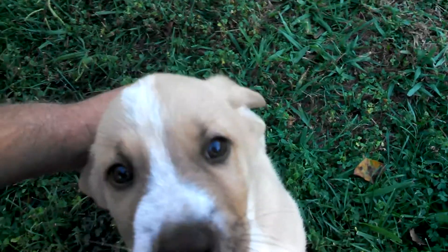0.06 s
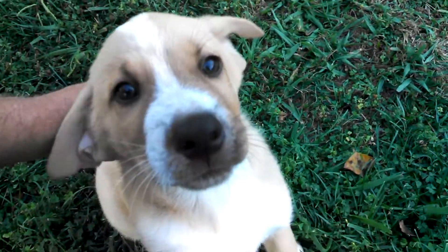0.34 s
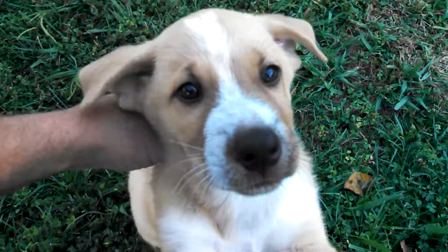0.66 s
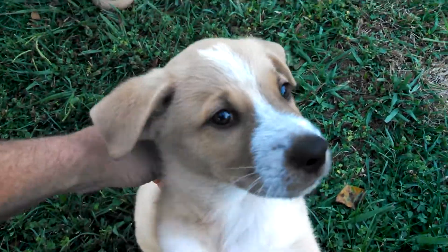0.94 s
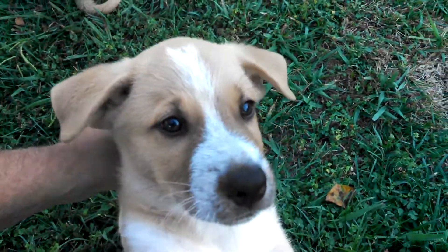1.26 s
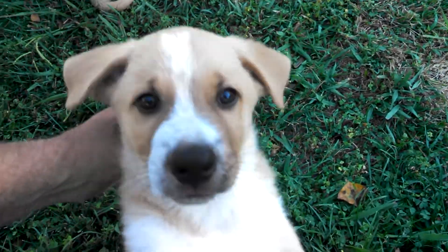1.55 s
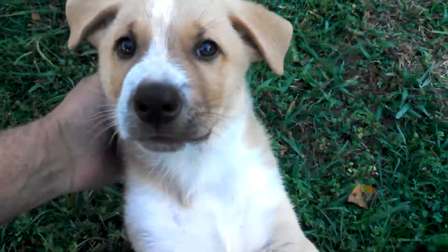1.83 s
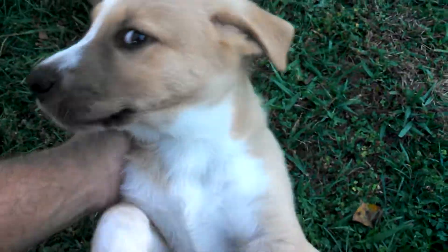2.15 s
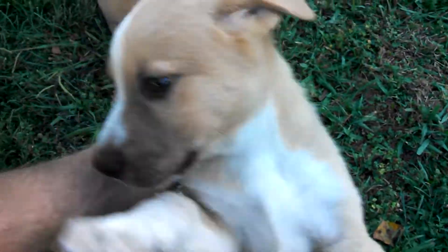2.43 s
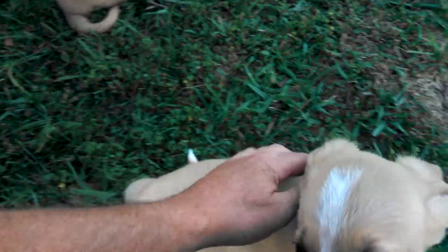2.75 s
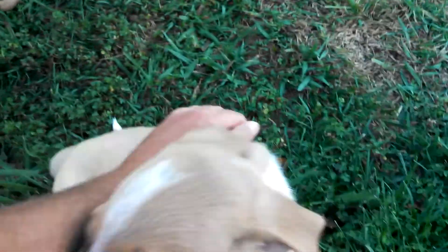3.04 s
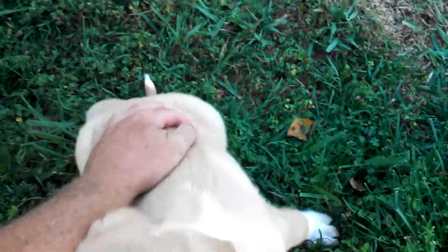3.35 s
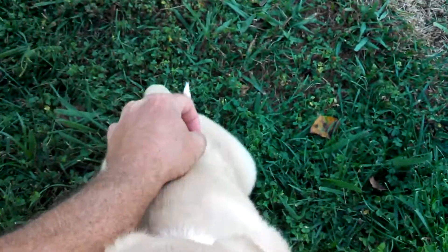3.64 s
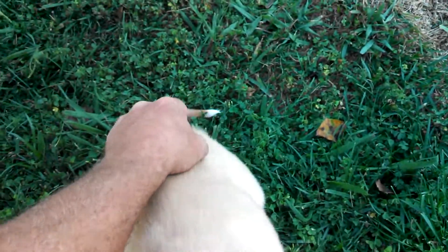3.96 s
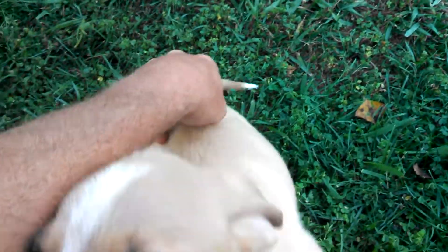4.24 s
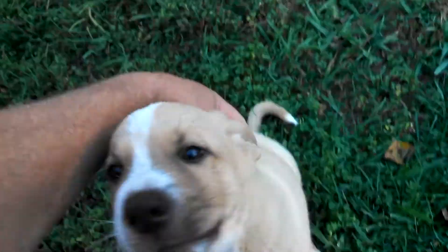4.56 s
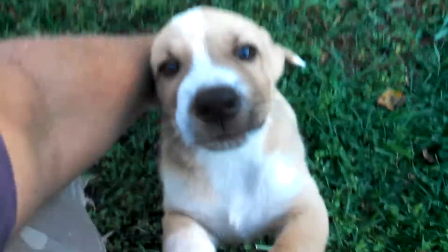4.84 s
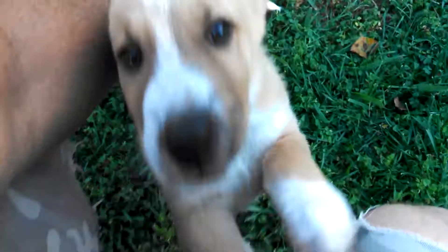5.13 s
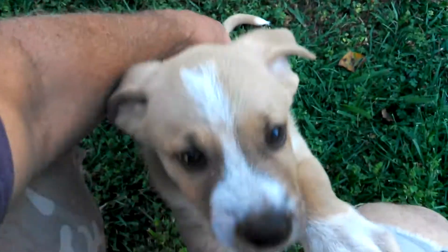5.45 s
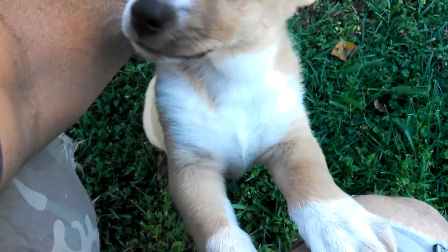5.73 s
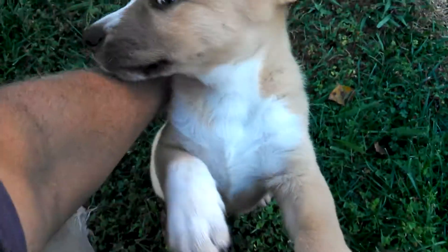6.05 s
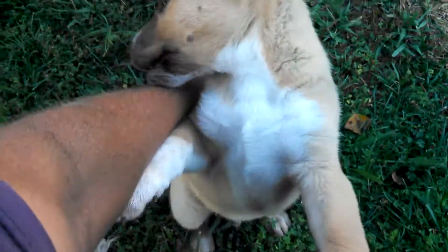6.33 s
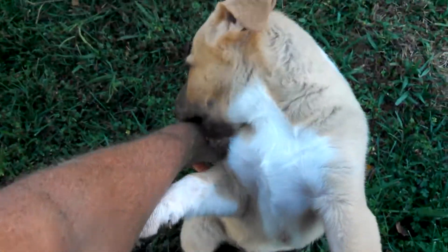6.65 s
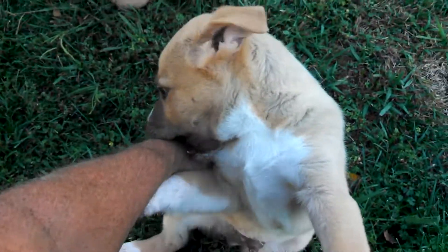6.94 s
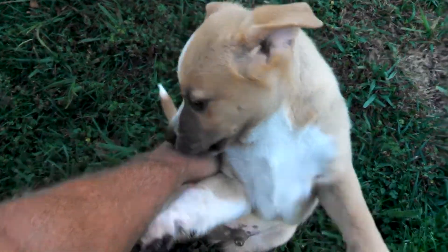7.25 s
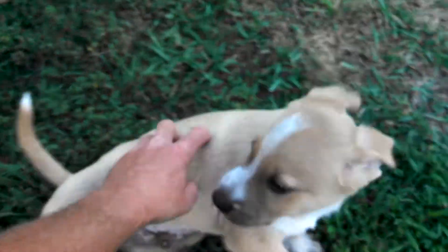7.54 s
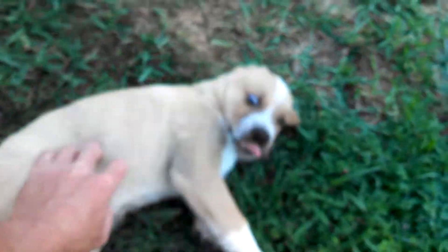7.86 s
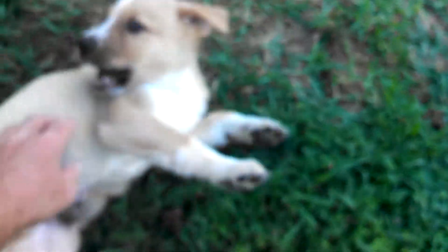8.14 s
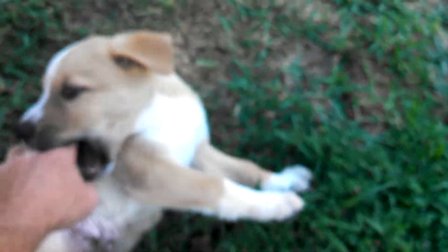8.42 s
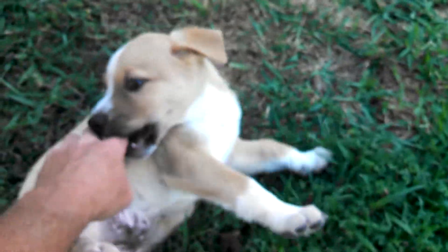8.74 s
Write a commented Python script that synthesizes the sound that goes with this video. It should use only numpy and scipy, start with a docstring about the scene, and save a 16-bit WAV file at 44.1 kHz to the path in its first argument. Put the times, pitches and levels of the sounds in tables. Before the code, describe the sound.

Small birds chirp in a yard over distant traffic hum, while a hand rustles a puppy's fur and air puffs on the microphone.

```python
"""Birds and a puppy in a yard.

Small birds whistle gliding chirps, echoed by walls and trees, over distant traffic hum and a breeze.
Close by, a hand pets a puppy: fur and grass slip and rustle, with a few light taps. Air puffs on the
microphone; an insect buzzes once. The camera widens its stereo by crossing its two ports."""
import sys
import numpy as np
from scipy import signal
from scipy.fft import rfft, irfft, next_fast_len
from scipy.io import wavfile
from scipy.ndimage import uniform_filter1d, map_coordinates

SR = 44100
rng = np.random.default_rng(int(sys.argv[2]) if len(sys.argv) > 2 else 0)


def store_pcm(level_fs):
    """Save levels as 16-bit WAV."""
    pcm = np.round(np.clip(level_fs, -1, 1) * 32767).astype(np.int16)
    wavfile.write(sys.argv[1], SR, np.atleast_2d(pcm).T)


N = 396452

# Levels are relative, ahead of the mix gains.
# near notes: t/s, length/s, start/Hz, end/Hz, swing/Hz, swings, level/dB, octave/dB, odd overtones/dB
NEAR_CHIRPS = [ (0.431, 0.031, 2380, 2430, 260, 1, -36.5, -30, -47),
               (0.4514, 0.021, 2448, 2480, -15, 1, -30, -31, -48),
               (0.465, 0.017, 2460, 2460, -2, 1, -30, -28, -48),
               (0.479, 0.024, 2333, 2134, 31, 1, -29, -25, -46),
               (0.492, 0.021, 2164, 1985, -40, 1, -41.5, -9, -23),
               (0.535, 0.022, 1980, 2027, 122, 1, -32.5, -25, -46),
               (0.556, 0.011, 2080, 1320, 2, 1, -51.5, -0.5, -30),
               (2.339, 0.017, 2104, 1990, 70, 1, -41.5, -19, -30),
               (2.356, 0.038, 1985, 1964, 181, 3, -40.5, -12.5, -27),
               (2.396, 0.0274, 1930, 1707, 27, 1, -40, -16, -18),
               (2.453, 0.025, 2020, 2020, 96, 1, -33, -27, -42),
               (2.478, 0.0463, 1887, 2154, 29, 1, -63.5, 12, -15),
               (2.921, 0.047, 1865, 1850, 10, 1, -48.5, -20, -29),
               (2.955, 0.052, 1888, 1760, 55, 1, -41.5, -22, -21),
               (3.024, 0.04, 1990, 1934, 160, 1, -42.5, -17, -34),
               (4.806, 0.023, 2126, 1696, 190, 1, -41, -25, -39),
               (4.825, 0.0207, 1786, 2616, 0, 1, -34, -23, -41),
               (4.846, 0.0144, 1750, 2660, -60, 1, -33, -21, -41),
               (4.857, .008, 2600, 1550, 0, 1, -36, -20, -41),
               (4.862, .018, 1502, 1400, 582, 1, -35.5, -18, -41),
               (4.877, 0.031, 2500, 2800, -20, 1, -42.5, -30, -40),
               (4.945, 0.04, 1630, 1830, -9, 1, -47.5, -1, -11),
               (6.763, 0.094, 1946, 1948, 148, 2, -38, -23, -31),
               (6.85, 0.013, 2100, 2690, 150, 3, -31.5, -27, -36), ]
# thin, high arch: t/s, length/s, start/Hz, end/Hz, swing/Hz, swings, level/dB
FAR_WHISTLE = (5.22, .24, 6300, 6050, 1100, 1, -60.5)
# falling notes: t/s, length/s, start/Hz, end/Hz, level/dB
FAR_SLURS = [(0.979, 0.043, 4380, 3900, -57.5), (1.253, 0.095, 4250, 4190, -63),
             (2.066, 0.032, 3410, 2650, -55), (2.205, 0.029, 2990, 2520, -49),
             (3.322, 0.037, 2950, 2220, -53), (4.648, 0.035, 2940, 2300, -54), (5.06, 0.1, 6360, 5580, -58),
             (6.697, 0.11, 2730, 2020, -51.5), (7.923, 0.06, 2700, 1530, -58),
             (8.148, 0.039, 2250, 1440, -58)]
# yard decay: f/Hz, t60/s
YARD_T60 = [(500, .42), (2200, 0.55), (8000, 0.04)]
# stroking hand: t/s, pressure/dB
HAND_PRESSURE = [(0.0, -76), (1.69, -89), (2.77, -77.5), (2.91, -82.5), (3.14, -81), (3.36, -78.5),
                 (3.85, -81.5), (4.16, -79), (4.6, -78.5), (5.2, -77.5), (6.79, -87), (6.89, -81),
                 (7.5, -82), (7.82, -76), (8.55, -83), (8.8, -81.5)]
# quick brushes: t/s, length/s, level/dB, fine-slip boost/dB
BRUSH_STROKES = [(2.635, 0.046, -49.5, 5), (2.669, 0.061, -51.5, 4.5), (2.73, 0.052, -48, 5),
                 (3.12, 0.063, -53, 6), (3.92, 0.051, -62, 4), (4.06, .09, -58, -3), (5.907, 0.15, -61, 5),
                 (6.26, .1, -57.5, 2.5), (6.754, 0.24, -58.5, 4), (7.452, .11, -54.5, 8),
                 (7.633, 0.042, -54, 8.5), (7.88, .2, -65, 8), (8.257, 0.096, -64, 9)]
# fur and grass friction: f/Hz, density/dB
FUR_SPECTRUM = [(300, -3), (1200, 6), (2500, 6), (4700, 7.5), (7300, 4), (9000, -3), (10300, -23),
                (12500, -8.5), (15000, -10.5)]
# light taps, snapping grass: t/s, f/Hz, level/dB, t60/s
TAP_HITS = [(.008, 430, -28, .035), (.031, 6300, -35, .004), (.254, 510, -33.5, .03), (.346, 380, -39, .04),
            (2.694, 6400, -33, .003), (2.7085, 6800, -30, .003), (2.758, 4300, -34, .002),
            (3.8457, 6400, -33, .003), (3.8635, 4600, -30.5, .003), (4.297, 380, -37, .04),
            (4.642, 425, -25, .025), (4.687, 1600, -25, .003), (5.056, 1300, -37, .012),
            (7.647, 4200, -45, .05)]
# air puffs: t/s, length/s, level/dB
AIR_PUFFS = [(1.76, 0.19, -31), (1.9, 0.36, -37.5), (3.74, 0.21, -32.5), (4.24, 0.09, -42),
             (7.65, 0.39, -50)]
# air buffeting the ports: f/Hz, density/dB
PUFF_SPECTRUM = [(20, 5.5), (40, 8.5), (70, -3.5), (130, -11.5), (300, -35), (1000, -83)]
# insect buzz: f/Hz, density/dB
INSECT_SPECTRUM = [(5000, -41), (7100, -7), (7700, 9), (8500, 10), (9200, -9), (9800, -46)]
# traffic rumble: f/Hz, density/dB
TRAFFIC_SPECTRUM = [(20, -101), (45, -71), (70, -65.5), (135, -69.5), (180, -73.5), (260, -75), (500, -87),
                    (1200, -102), (3000, -125)]
# engine hum bands: f/Hz, width/Hz, level/dB
ENGINE_BANDS = [(76.2, 5.2, -56.5), (135, 24, -54.5), (208.3, 16.5, -61)]
# traffic drift: t/s, level/dB
TRAFFIC_DRIFT = [(0.5, -49.5), (0.92, -52), (1.23, -54), (2.82, -51), (5.89, -54), (6.06, -54.5),
                 (7.99, -51), (8.99, -53)]
# breeze in leaves: f/Hz, density/dB
BREEZE_SPECTRUM = [(100, -100), (350, -82), (650, -84), (1100, -91.5), (2300, -95.5), (3300, -96),
                   (5000, -100.5), (7500, -104), (10000, -116), (15000, -114)]
# background hiss level, slightly louder midway: t/s, level/dB
HISS_DRIFT = [(0, 0), (1.5, -1), (2.1, 2), (4.8, 2), (5.9, -1), (9, -1)]
# likeness of the ports in diffuse sound: f/Hz, correlation (clipped to +-1)
PORT_CORRELATION = [(30, -1.24), (65, -0.71), (130, 0.075), (280, -0.59), (550, 0.48), (1200, -0.076)]
# stereo widening: f/Hz, share of the other port
PORT_CROSSFEED = [(300, 0.01), (1200, 0.93)]


def amp(db):
    return 10 ** (np.asarray(db) / 20)


def unit_rms(x):
    return x / np.sqrt(np.mean(x ** 2) + 1e-20)


def time_s():
    return np.arange(N) / SR


def over_hz(points, hz):
    """Interpolate (f/Hz, value) on a log axis."""
    f, values = np.transpose(points)
    return np.interp(np.log(hz + 1), np.log(f + 1), values)


def over_time(points):
    """Interpolate (t/s, value) per sample."""
    return np.interp(time_s(), *np.transpose(points))


def wobble(rate_hz):
    """Smooth random curve."""
    knots = rng.standard_normal(int(N * rate_hz / SR) + 4)
    return map_coordinates(knots, [time_s() * rate_hz])


def filtered(x, response):
    """Apply a complex response(f/Hz)."""
    size = next_fast_len(N + SR // 2)
    return irfft(rfft(x, size) * response(np.fft.rfftfreq(size, 1 / SR)), size)[..., :N]


def diffuse(density):
    """Noise from all around at the two ports, shaped by density(f/Hz)."""
    def mid_side(hz):
        angle = np.arccos(np.clip(over_hz(PORT_CORRELATION, hz), -1, 1)) / 2
        return density(hz) * np.array([np.cos(angle), np.sin(angle)])
    mid, side = filtered(rng.standard_normal((2, N)) * np.sqrt(SR / 2), mid_side)
    return np.array([mid + side, mid - side])


def noise(spectrum):
    """Diffuse noise from (f/Hz, density/dB)."""
    return diffuse(lambda hz: amp(over_hz(spectrum, hz)))


def swells(rows):
    """Half-sine envelopes from (t/s, length/s, level/dB)."""
    t = time_s()
    return sum(amp(db) * np.sin(np.pi * np.clip((t - at_s) / length_s, 0, 1))
               for at_s, length_s, db in rows)


def bird_note(at_s, length_s, start_hz, end_hz, swing_hz, swings, db, octave_db=-40, odd_db=-60,
              *, waver, flutter_db=1.5, rasp_rad=0.64, trill_db=4.2):
    """Unsteady whistle with a raspy octave; pitch swings about a glide once (arch) or more (trill)."""
    span = np.arange(int(at_s * SR), int((at_s + length_s) * SR))
    progress = np.linspace(0, 1, len(span))
    white = rng.standard_normal((3, SR // 2))[:, :len(span)]
    tremor, flutter, rasp = (unit_rms(uniform_filter1d(row, size=120)) for row in white)
    swing = np.sin(np.pi * swings * progress)
    hz = start_hz + (end_hz - start_hz) * progress + swing_hz * swing
    phase = 2 * np.pi * np.cumsum(hz * (1 + waver * tremor)) / SR
    accent_db = trill_db * swing * (swings > 1)
    envelope = amp(db + accent_db) * np.abs(np.sin(np.pi * progress)) ** .85
    octave = amp(octave_db + flutter_db * flutter) * np.sin(2 * phase + rasp_rad * rasp)
    odd = amp(odd_db) * (np.sin(3 * phase) + .3 * np.sin(5 * phase))
    out = np.zeros(N)
    out[span] = envelope * (np.sin(phase) + octave + odd)
    return out


def near_birds(left_db=-9, lead_s=1e-4, ground_s=0.0042, ground_db=-20, direct_db=7.5, echo_db=-4.5):
    """Chirps differ in time and level at the ports; the ground bounce beats with each glide."""
    song = sum(bird_note(*row, waver=0.013) for row in NEAR_CHIRPS)
    bounce = amp(ground_db) * np.pad(song, (int(ground_s * SR), 0))[:N]
    right = song + bounce
    left = filtered(right, lambda hz: amp(left_db) * np.exp(2j * np.pi * hz * lead_s))
    return amp(direct_db) * np.array([left, right]) + amp(echo_db) * yard_echoes(song)


def far_birds(direct_db=-1, echo_db=-5):
    """Faint falling notes and one thin whistle."""
    song = bird_note(*FAR_WHISTLE, waver=0.0073)
    for *glide, db in FAR_SLURS:
        song += bird_note(*glide, swing_hz=0, swings=1, db=db, waver=0.023)
    return amp(direct_db) * song * amp([[-6], [0]]) + amp(echo_db) * yard_echoes(song)


def yard_echoes(song, delay_s=.005, scatter_db=4, scatter_t60_s=0.05):
    """Nearby things scatter briefly, walls and trees for longer; treble dies first."""
    hz, t, spectra = signal.stft(rng.standard_normal((2, SR // 2)), SR, nperseg=256)
    late = amp(-60 * t / over_hz(YARD_T60, hz)[:, None])
    early = amp(scatter_db - 60 * t / scatter_t60_s)
    tail = signal.istft(spectra * (late + early), SR, nperseg=256)[1]
    tail = np.pad(tail / np.linalg.norm(tail[0]), ((0, 0), (int(delay_s * SR), 0)))
    return signal.fftconvolve(song[None], tail, axes=1)[:, :N]


def petting(stroke_db=-60, pressure_power=1.37, brush_db=-3, grain_db=2, drag_db=1.5, split_hz=3800):
    """Hairs and grass slip in tiny coarse and fine bursts under strokes and quick brushes."""
    def slips():
        return unit_rms(noise(FUR_SPECTRUM) * amp(grain_db * wobble(700) + drag_db * wobble(40)))
    coarse_share = lambda hz: 1 / (1 + (hz / split_hz) ** 8)
    coarse = filtered(slips(), lambda hz: np.sqrt(coarse_share(hz)))
    fine = filtered(slips(), lambda hz: np.sqrt(1 - coarse_share(hz)))
    pressure_db = over_time(HAND_PRESSURE)
    stroking = amp(stroke_db + pressure_power * (pressure_db - pressure_db.mean()))
    coarse_brush = swells(row[:3] for row in BRUSH_STROKES)
    fine_brush = swells((*timing, db + boost_db) for *timing, db, boost_db in BRUSH_STROKES)
    return stroking * (coarse + fine) + amp(brush_db) * (coarse_brush * coarse + fine_brush * fine)


def taps(crack_db=-9):
    """Small contacts build within a cycle and ring briefly; lower ones have a duller crack."""
    out = np.zeros(N + SR)
    t = np.arange(SR // 10) / SR
    for at_s, hz, db, t60_s in TAP_HITS:
        blur_samples = max(1, int(SR / (3 * hz)))
        crack = unit_rms(uniform_filter1d(rng.standard_normal(len(t)), blur_samples))
        ring = np.sin(2 * np.pi * hz * t)
        envelope = amp(db - 60 * t / t60_s) * (1 - np.exp(-2 * hz * t))
        out[round(at_s * SR):][:len(t)] += envelope * (ring + amp(crack_db) * crack)
    return out[:N] * amp([[-3], [1]])


def air_puffs():
    """Moving air thumps softly on the ports."""
    return swells(AIR_PUFFS) * unit_rms(noise(PUFF_SPECTRUM))


def insect(at_s=8.83, length_s=0.18, db=-53):
    """Short, high buzz in the grass."""
    buzz = unit_rms(noise(INSECT_SPECTRUM) * amp(2.1 * wobble(200)))
    return swells([(at_s, length_s, db)]) * buzz


def traffic(gain_db=-0.88):
    """Distant rumble with a blurred engine hum."""
    hum = 0
    for centre_hz, width_hz, db in ENGINE_BANDS:
        band = diffuse(lambda hz: 1 / (1 + (2 * (hz - centre_hz) / width_hz) ** 2))
        hum += amp(db) * unit_rms(band)
    drift_db = over_time(TRAFFIC_DRIFT)
    drift_db -= drift_db.mean()
    return (noise(TRAFFIC_SPECTRUM) + hum) * amp(gain_db + drift_db + 0.071 * wobble(2.9))


def breeze():
    """Light air hisses in the leaves."""
    return noise(BREEZE_SPECTRUM) * amp(over_time(HISS_DRIFT) + 0.092 * wobble(3.18))


def scene():
    """All sources at the left and right ports."""
    events = near_birds() + far_birds() + insect() + taps() + air_puffs()
    bed = traffic() + breeze() + petting()
    return events + bed * amp([[-.6], [.6]])


def record(dry, cross_delay_s=16 / SR, cutoff_hz=15500):
    """Each channel subtracts the other port, delayed, to widen the image; then a band limit."""
    share = lambda hz: over_hz(PORT_CROSSFEED, hz)
    crossed = filtered(dry[::-1], lambda hz: share(hz) * np.exp(-2j * np.pi * hz * cross_delay_s))
    wide = filtered(dry - crossed, lambda hz: (hz < cutoff_hz) / np.sqrt(1 + share(hz) ** 2))
    return wide * amp([[-.4], [.4]])


dry = scene()
out = record(dry)
store_pcm(out)
```